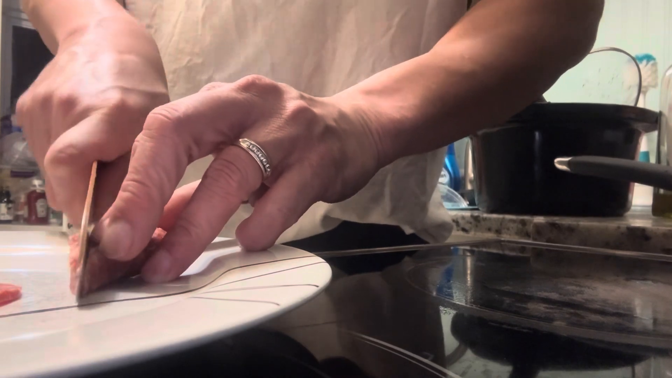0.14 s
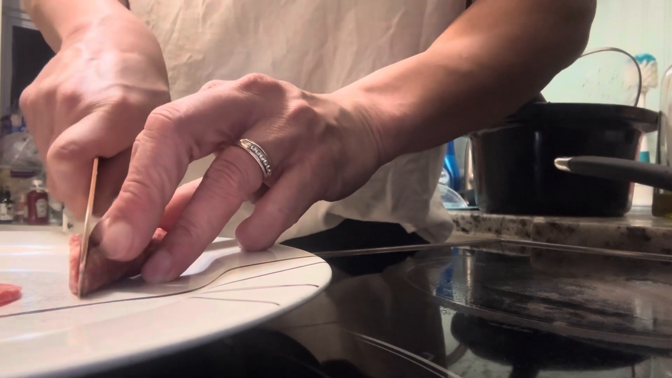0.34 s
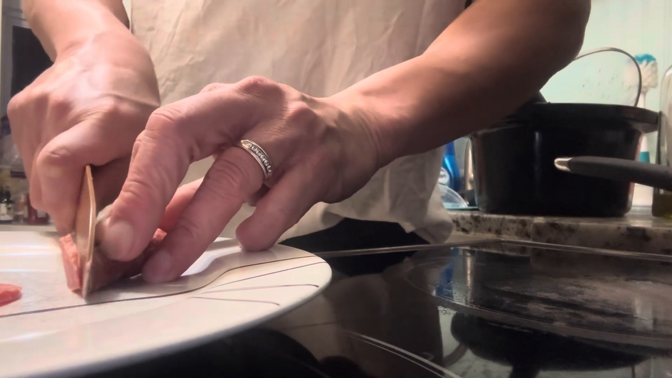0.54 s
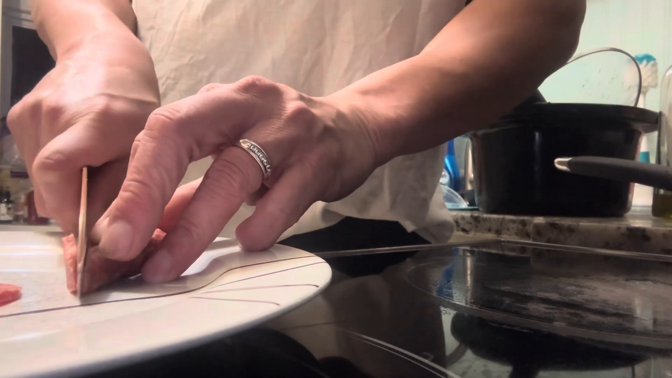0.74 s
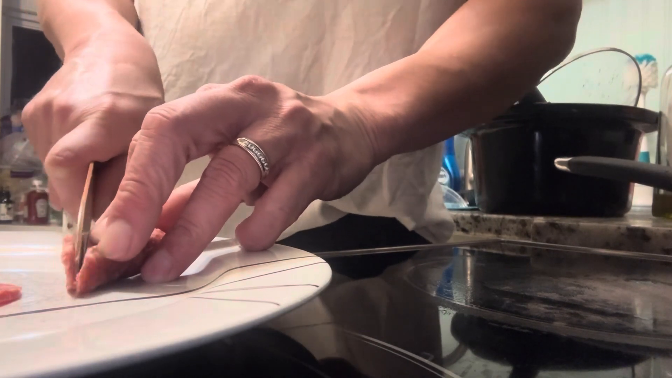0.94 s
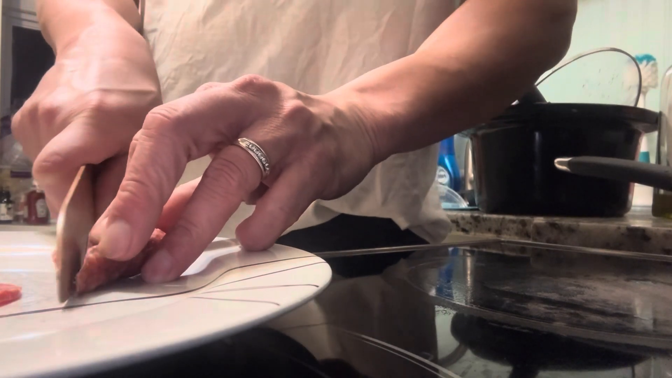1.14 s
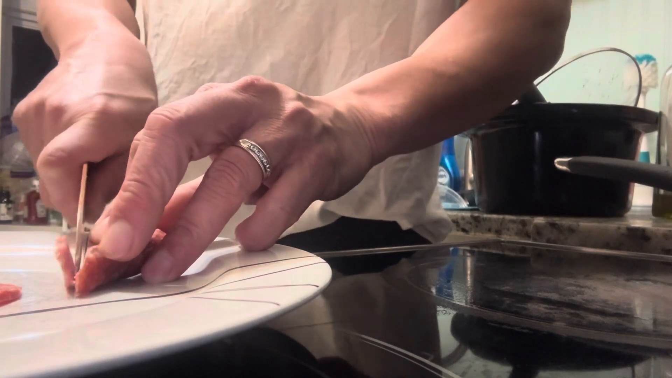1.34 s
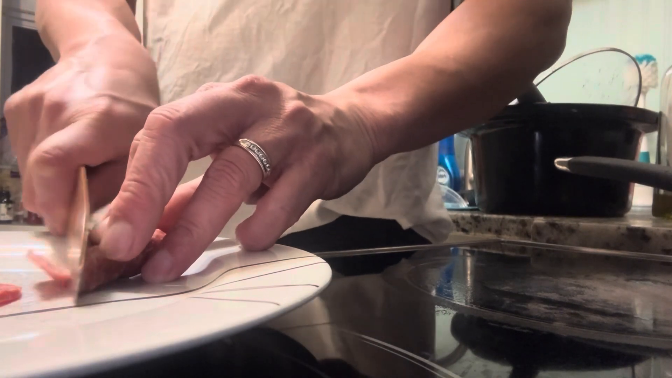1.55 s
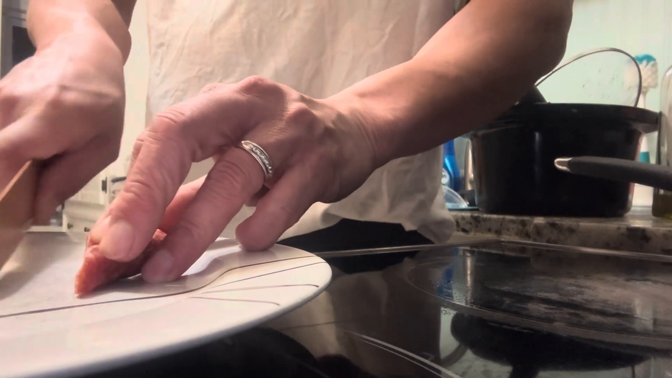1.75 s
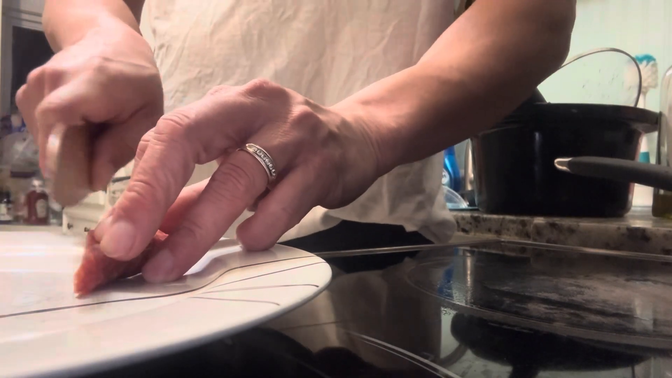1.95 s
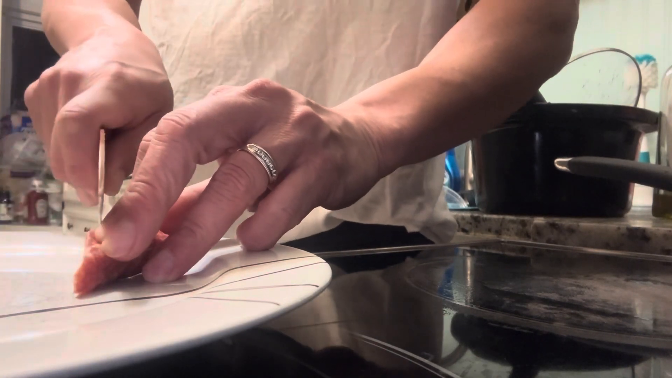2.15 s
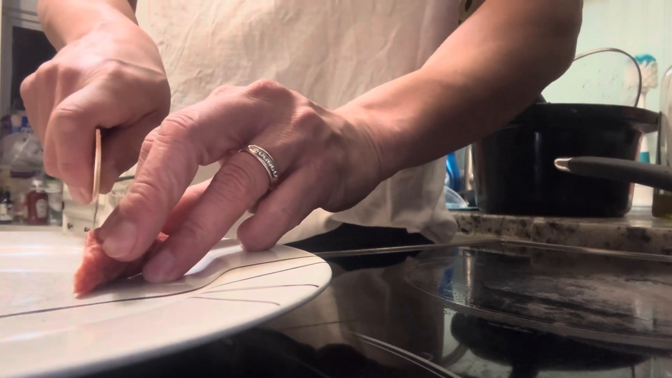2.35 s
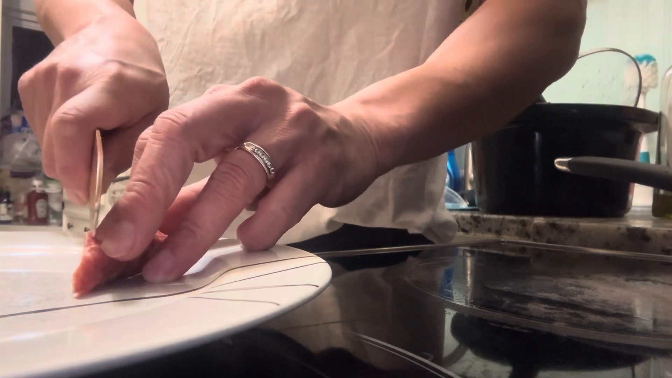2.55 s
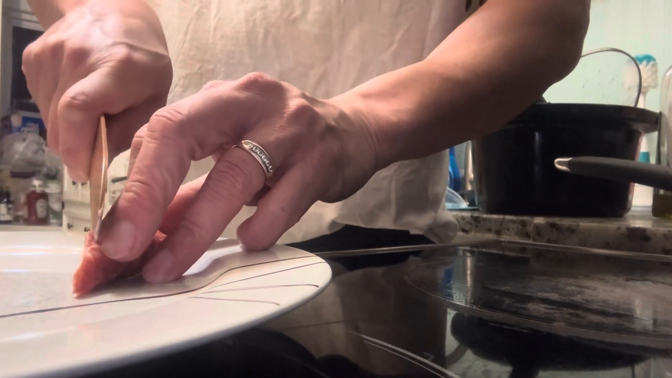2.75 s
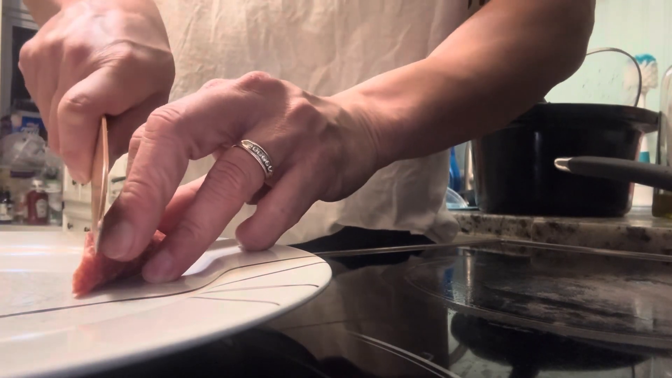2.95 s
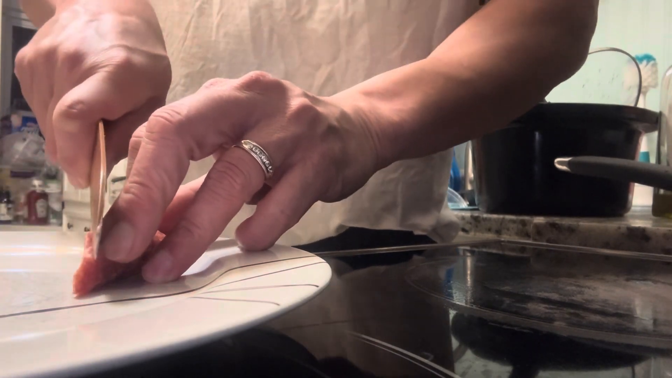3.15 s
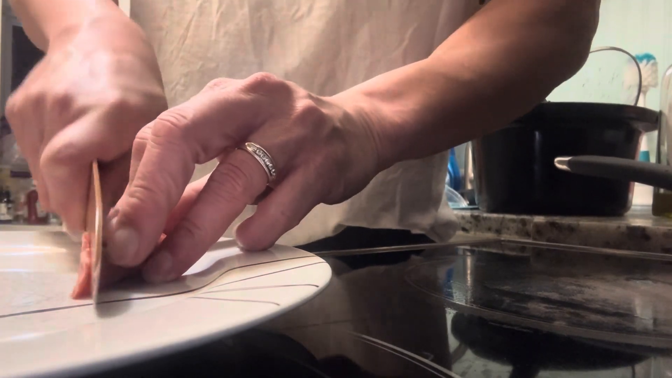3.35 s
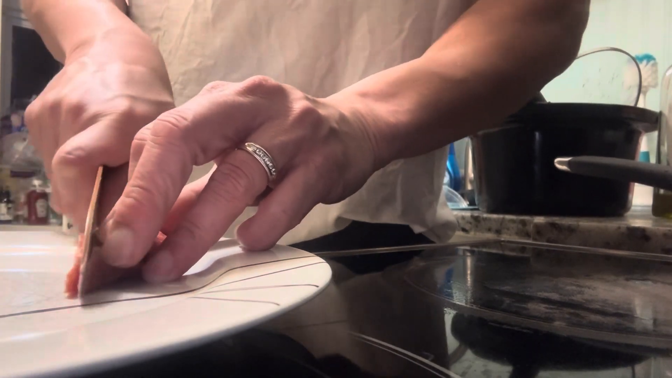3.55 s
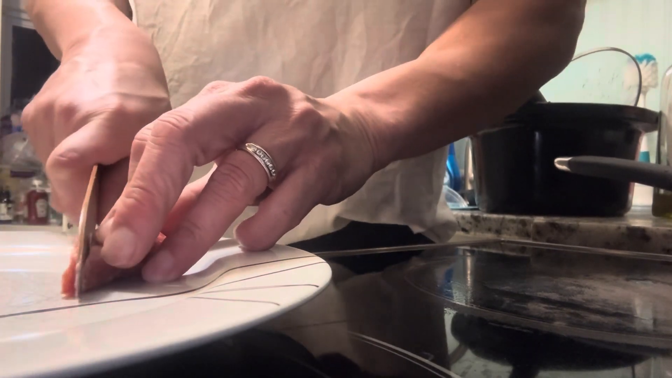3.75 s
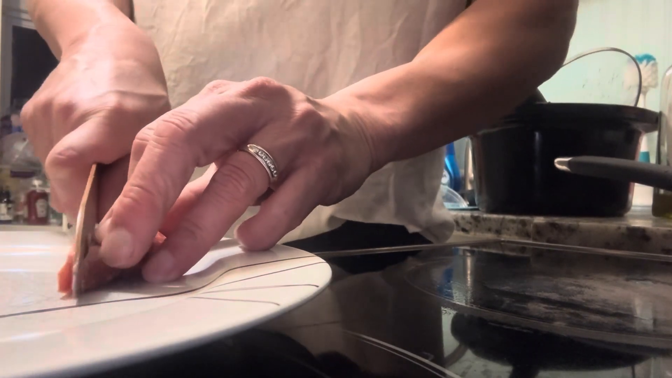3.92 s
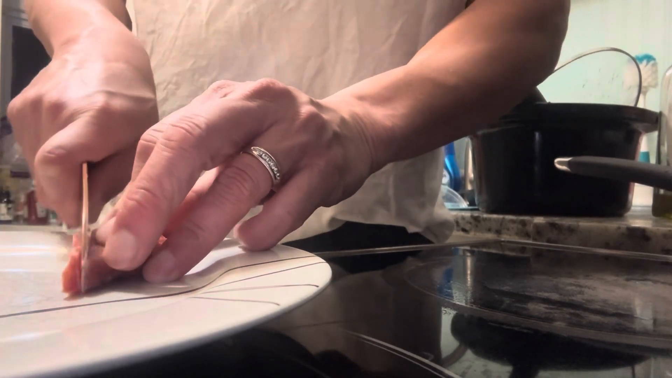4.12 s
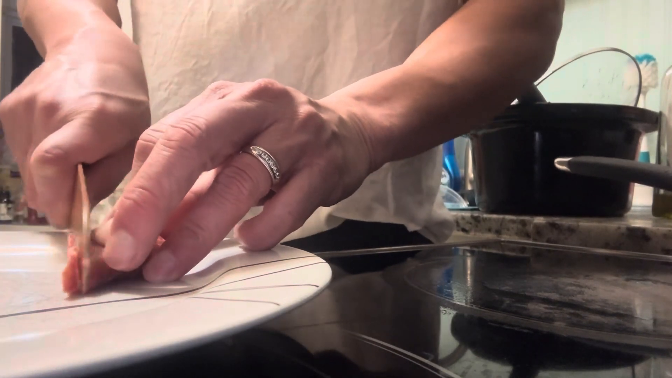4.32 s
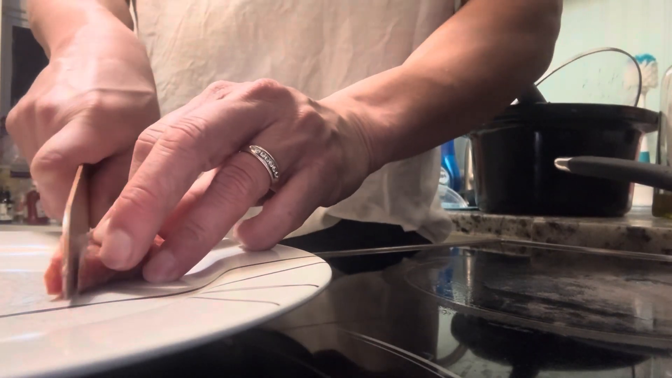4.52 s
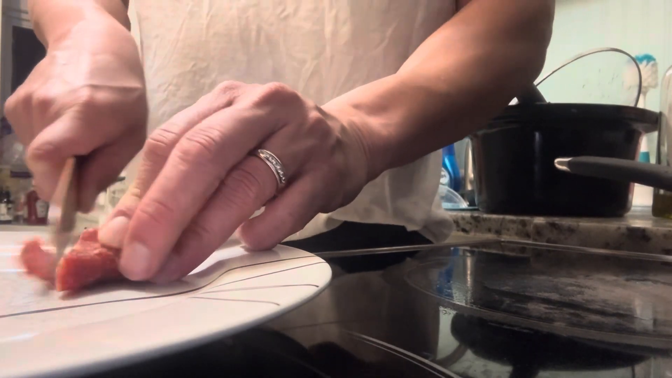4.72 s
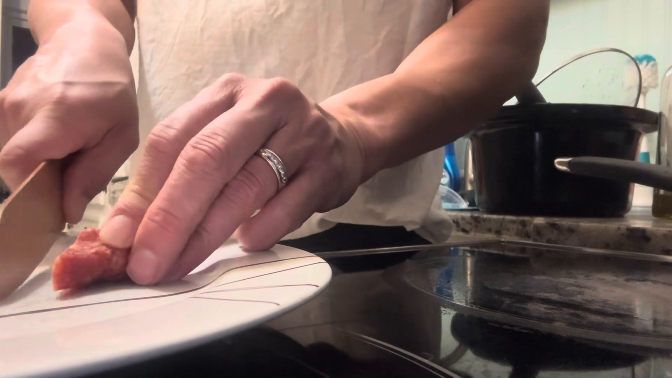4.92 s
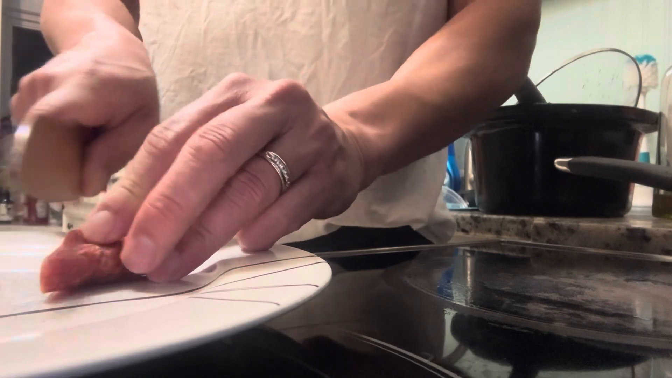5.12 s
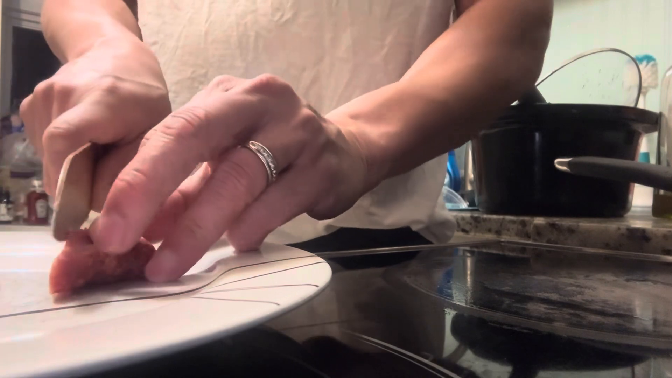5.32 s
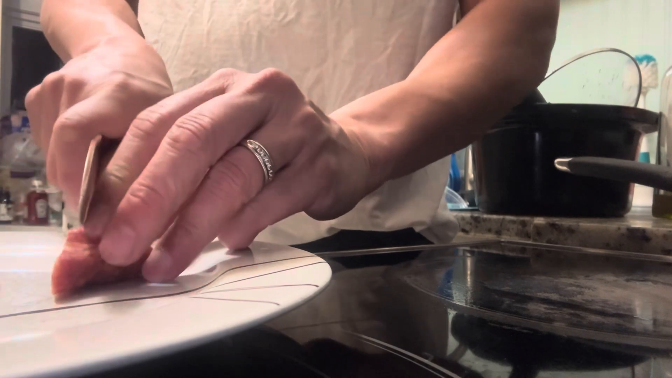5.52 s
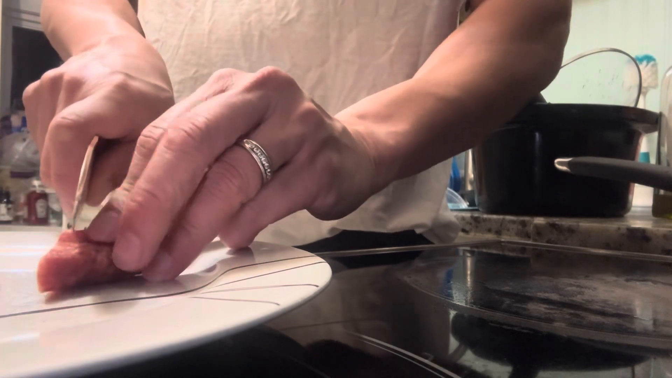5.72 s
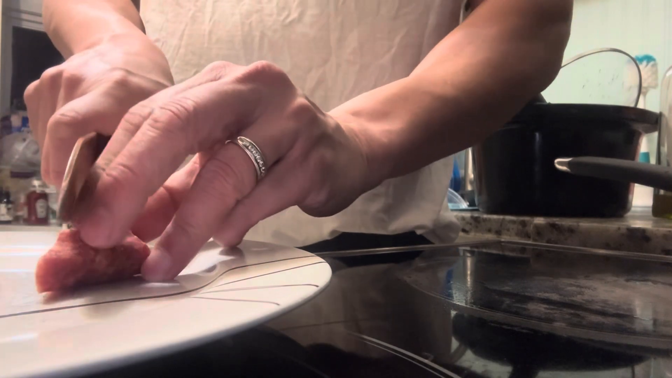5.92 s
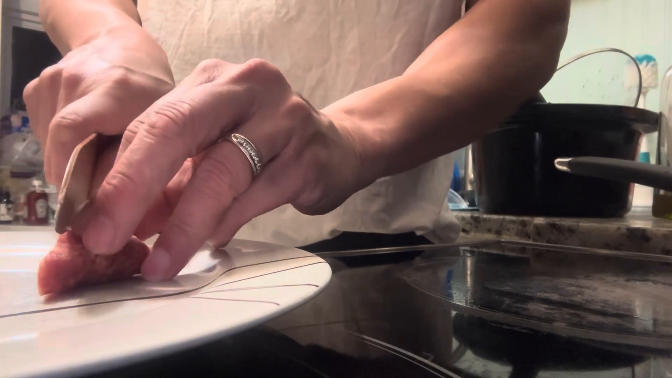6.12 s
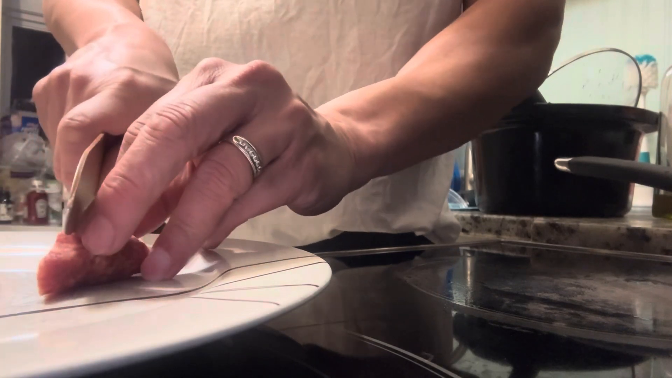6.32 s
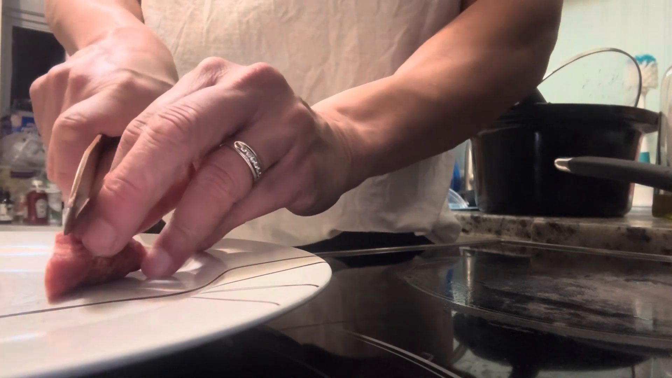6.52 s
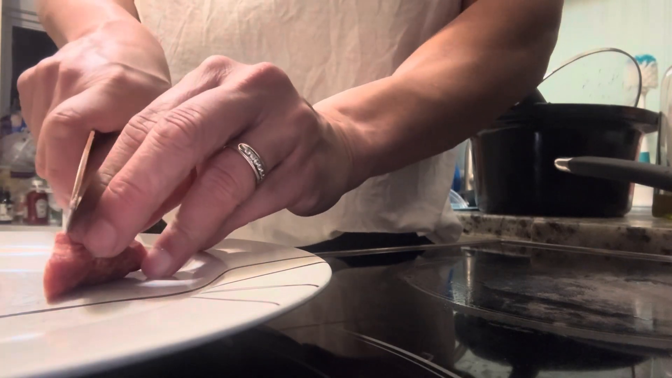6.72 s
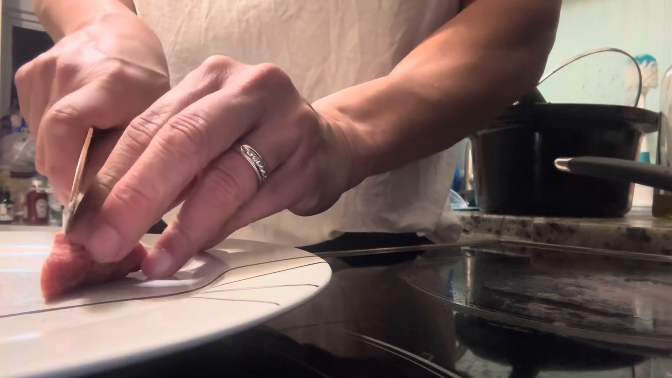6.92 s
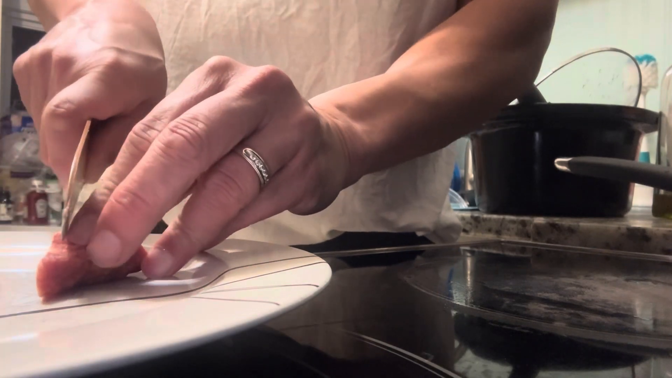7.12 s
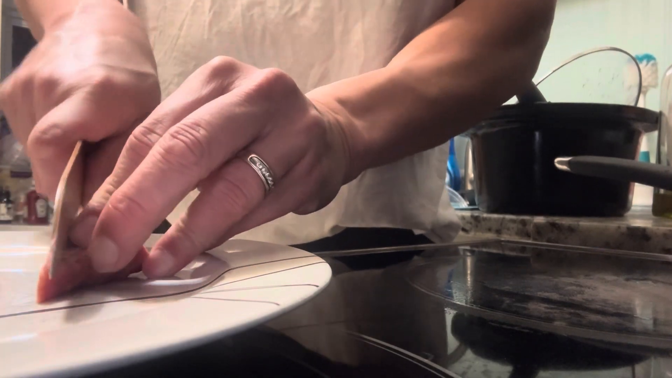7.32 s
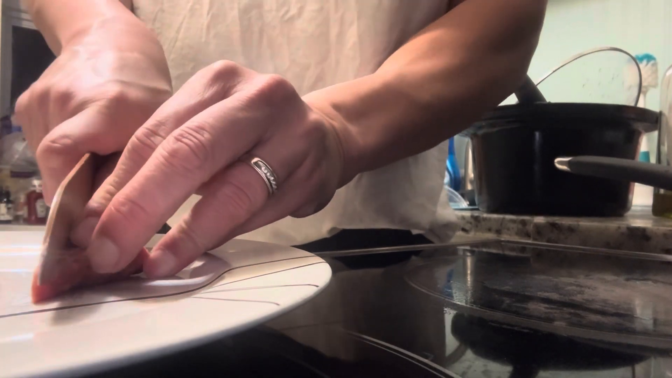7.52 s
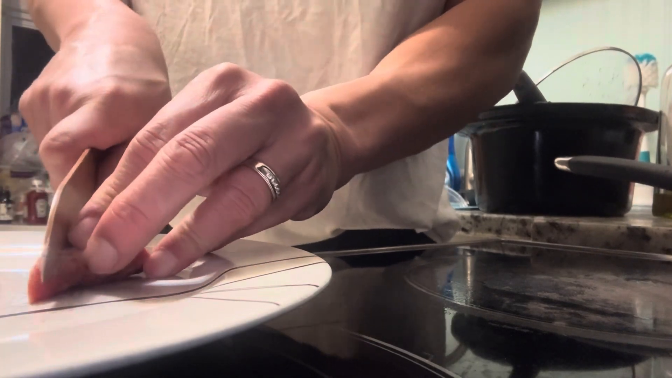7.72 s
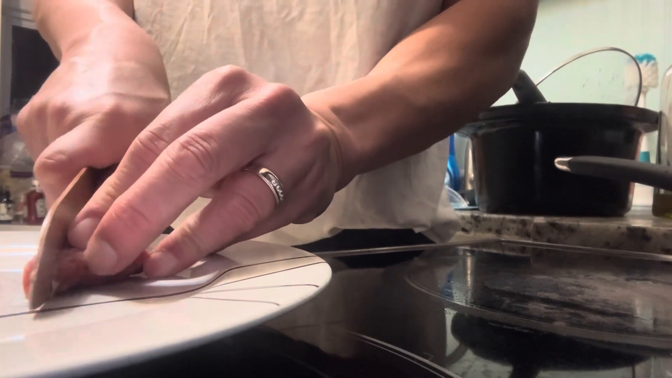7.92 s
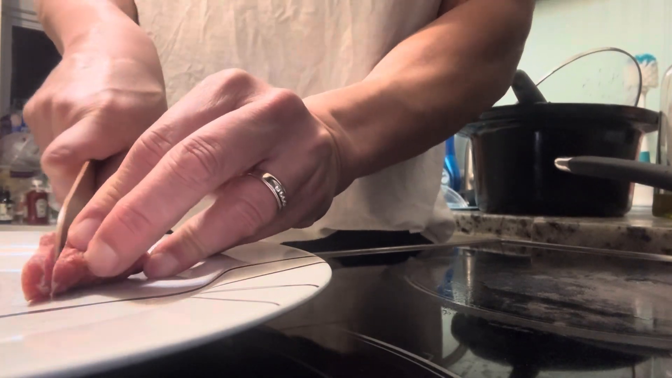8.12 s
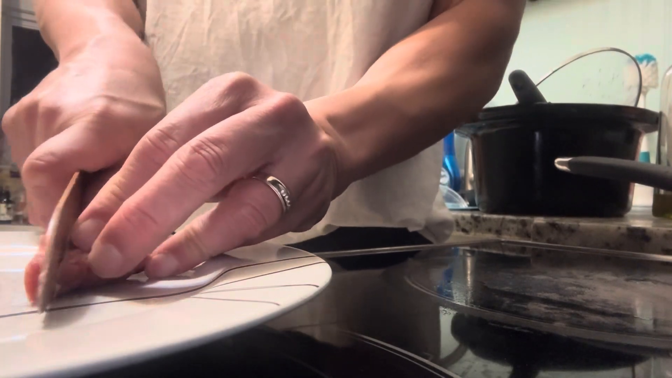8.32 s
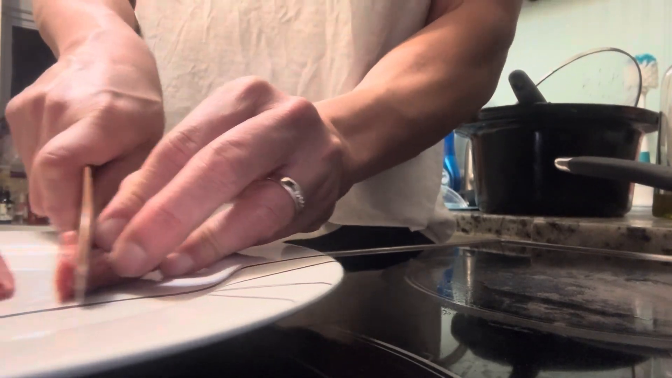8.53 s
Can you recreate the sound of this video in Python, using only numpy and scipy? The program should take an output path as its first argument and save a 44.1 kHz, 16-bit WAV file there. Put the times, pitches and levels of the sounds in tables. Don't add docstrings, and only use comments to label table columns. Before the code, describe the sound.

Irregular clacks and gritty skids of a blade on a glazed plate, between gentle sawing and low thuds in a quiet kitchen.

```python
import sys
import numpy as np
from scipy import signal
from scipy.fft import rfft, irfft, next_fast_len
from scipy.io import wavfile
from scipy.ndimage import uniform_filter1d

SR = 44100
rng = np.random.default_rng(int(sys.argv[2]) if len(sys.argv) > 2 else 0)


def to_wav(s):
    ch = np.atleast_2d(s).T
    pcm = np.round(np.clip(ch, -1, 1) * 32767)
    wavfile.write(sys.argv[1], SR, pcm.astype(np.int16))


def gain_from_db(level_db):
    decades = np.asarray(level_db, float) / 20
    return 10 ** decades


N = 381906
T = np.arange(N) / SR

# centre_hz, width_hz, level_db
PLATE_MODES = [(1670, 250, 1.5), (2080, 60, -11.5), (2350, 90, -2.5), (2776, 28, -2), (3140, 49, -3.5),
               (3635, 200, -3.5), (4100, 660, -9.5), (3980, 590, -14), (5813, 330, -9), (6160, 58, -11),
               (6780, 440, -9), (7565, 230, -7.5), (8600, 270, -18.5)]
# time_s, tremble_db
HAND_EFFORT = [(0, -49), (.6, -55), (.8, -50.5), (.95, -64.5), (1.4, -45.5), (1.9, -59.5), (2.7, -73.5),
               (3.0, -52.5), (3.5, -64), (3.83, -48), (4.2, -64), (4.6, -46), (4.92, -60), (5.1, -64),
               (6.3, -59.5), (7.6, -61.5), (7.8, -53), (8.66, -48)]
# start_s, jolt_db, bounce_hz, knock_hz, knock_db
PLATE_THUMPS = [(0.009, -32, 115.1, 530, -39.5), (0.146, -31.5, 105, 398, -39),
                (1.029, -32.5, 107.2, 250, -39.5), (1.278, -32, 90.5, 326.5, -25),
                (1.319, -38.5, 141.3, 325.5, -52), (1.61, -30, 106.2, 296.2, -18),
                (1.629, -27, 86.1, 250, -31), (3.256, -33.5, 123.7, 303.6, -34),
                (3.28, -32.5, 130.4, 282.3, -30), (3.342, -25, 98.5, 217.4, -27),
                (3.362, -21.5, 83.5, 268, -28.5), (4.36, -30, 136, 345, -14.5),
                (4.373, -23.5, 84.9, 206, -23.5), (4.908, -31.5, 121.7, 316, -35),
                (5.515, -18.5, 114.5, 237.6, -27), (7.179, -43, 129, 410, -49),
                (7.201, -32.5, 120, 260, -27), (7.746, -39, 110, 470, -38.5),
                (7.761, -30, 94.6, 526, -27.5), (7.771, -21, 94.5, 300, -33.5),
                (7.846, -40.5, 81, 620, -40), (7.861, -35, 69, 613, -37.5),
                (8.374, -43.5, 120.5, 670, -38.5), (7.987, -32.5, 109, 580, -55),
                (8.316, -46, 74.4, 620, -39.5), (8.384, -27.5, 125.5, 230, -34),
                (8.525, -30, 102.4, 482, -53), (8.598, -37, 104, 690, -40.5)]
# start_s, jolt_db, bounce_hz
MEAT_PUSHES = [(0.7, -38, 124.4), (1.343, -35.5, 105.8), (7.284, -34, 98), (1.658, -30.5, 78.9),
               (2.251, -40, 112), (2.347, -22.5, 114.7), (4.411, -21.5, 80), (4.469, -33, 94.9),
               (5.311, -44.5, 112), (5.708, -32.5, 119.2), (5.924, -22.5, 112.4), (6.18, -27, 115),
               (6.398, -41, 114.6), (6.649, -24.5, 100.3), (7.06, -46, 114.1), (7.543, -49, 103),
               (7.798, -20, 90.3), (7.841, -30.5, 75), (7.904, -48, 107)]
# start_s, peak_db, pitch_hz, length_s
BLADE_LEANS = [
    (0.332, -19.5, 100.8, 0.079),
    (2.976, -34, 105, 0.066),
    (3.754, -22.5, 89.2, .075),
    (7.272, -25.5, 93.2, 0.072),
]
ALL_JOLTS = PLATE_THUMPS + MEAT_PUSHES + BLADE_LEANS


def level(x, db):
    return x * gain_from_db(db) / np.sqrt(np.mean(x ** 2))


def log_grid():
    size = next_fast_len(N)
    return size, np.log(np.arange(size // 2 + 1) * SR / size + 1)


def shape(x, table, extra=1):
    size, log_hz = log_grid()
    at_hz, db = np.transpose(table)
    gain = gain_from_db(np.interp(log_hz, np.log(at_hz + 1), db))
    return irfft(rfft(x, size) * gain * extra, size)[..., :N]


def ring(x, hz, t60_s):
    pole = np.exp(2j * np.pi * hz / SR - np.log(1000) / (t60_s * SR))
    return signal.lfilter([1], [1, -pole], x).imag


def body(x, peaks, sharp=0.67):
    total = 0
    for hz, width_hz, db in peaks:
        t60_s = sharp * np.log(1000) / (np.pi * width_hz)
        total = total + gain_from_db(db) * np.pi * width_hz / sharp / SR * ring(x, hz, t60_s)
    return total


def split(x, hz, kind):
    return signal.sosfilt(signal.butter(4, hz, kind, fs=SR, output="sos"), x)


def walk(rate_hz):
    hold = int(SR / rate_hz)
    steps = np.repeat(rng.standard_normal(N // hold + 1), hold)
    return 1.2 * uniform_filter1d(steps, hold)[:N]


def add(track, start_s, x):
    i = max(int(start_s * SR), 0)
    track[..., i:i + x.shape[-1]] += x[..., :N - i]


def ports(x):
    # pitch_hz, left_lead_rad
    port_phase = [(25, 0), (75, -1.9), (125, -.7), (200, -1.7), (310, -3.5), (420, -3.1), (780, -5),
                  (1150, -6), (1750, -4.3), (2700, -2.2), (3700, -3.1), (4900, -3.1), (5600, -1.1),
                  (7200, .7), (9000, 2.6), (12500, 6.3)]
    # pitch_hz, left_over_right_db
    port_balance = [(60, -5), (120, -7), (180, 0), (700, -.5), (1200, -4), (2400, .5), (4900, -1),
                    (6300, -8), (8000, 0), (15000, 0)]
    _, log_hz = log_grid()
    at_hz, lead_rad = np.transpose(port_phase)
    lead_rad = np.interp(log_hz, np.log(at_hz), lead_rad)
    lift = 1 / np.sqrt(np.cos(lead_rad / 2) ** 2 + 0.2)
    pair = []
    for side in (1, -1):
        balance = [(hz, side * db / 2) for hz, db in port_balance]
        pair.append(shape(x, balance, lift * np.exp(0.5j * side * lead_rad)))
    return np.array(pair)


def wander(pair):
    drift_rad = 0.35 * walk(3)
    turn = np.exp(1j * drift_rad * np.array([[1], [-1]]))
    return (signal.hilbert(pair, next_fast_len(N))[:, :N] * turn).real


def kitchen():
    # pitch_hz, density_db_per_hz
    hum_colour = [(15, -35.5), (25, -18), (66, -0.5), (161, -7), (216, 0), (747, -21.5), (1030, -32),
                  (2580, -39), (3470, -38.5), (4670, -39.5), (6290, -35), (8010, -37), (10500, -81),
                  (13000, -32), (15700, -67)]
    floor_db, whine_hz, whine_db = -58.5, 3420, -88
    noise = shape(rng.standard_normal((3, N)) * gain_from_db(0.75 * walk(4.2)), hum_colour)
    whine_gain = gain_from_db(whine_db + 2 + 1.5 * walk(5.9))
    whine = whine_gain * np.sin(2 * np.pi * whine_hz * T + 0.6 * walk(20))
    return level(0.053 * ports(noise[0]) + noise[1:], floor_db + 2.5) + whine


def strokes():
    # middle_s, length_s, level_db, brightness_db
    saw_strokes = [(0.03, 0.39, -71, -26), (0.162, 0.34, -66, 5), (0.396, 0.53, -64.5, 3.5),
                   (0.746, 0.65, -66, 0), (0.954, 0.12, -64, -19), (1.02, 0.37, -62.5, 4.5),
                   (1.179, 0.123, -54.5, -3.5), (1.293, 0.091, -52, 3), (1.549, 0.2, -59.5, 11),
                   (1.705, 0.33, -60, 6), (2.894, 0.42, -72, 6.5), (3.02, 0.43, -61.5, -0.5),
                   (3.29, 0.35, -50, -8), (3.72, 0.086, -62.5, -3.5), (4.112, 0.42, -63, -1.5),
                   (4.302, 0.32, -63, 0.5), (4.395, 0.091, -51, -3), (4.636, 0.45, -65.5, -2.5),
                   (4.752, 0.53, -56.5, -1.5), (4.917, 0.11, -60, -9), (5.503, 0.2, -76.5, -4.5),
                   (6, 1, -93, 2.5), (6.299, 0.27, -74, -6), (6.73, 0.17, -70.5, -30),
                   (7.018, 0.14, -71, -4), (7.249, 0.38, -57, -16.5), (7.913, 0.81, -60.5, 6.5),
                   (8.112, 0.2, -71, 11.5), (8.24, 0.52, -71, 8), (8.483, 0.54, -62, 7.5)]
    rest_db = -22.5
    rest = gain_from_db(rest_db + np.interp(T, *np.transpose(HAND_EFFORT)))
    low, high = rest * np.ones((2, 1))
    for middle_s, length_s, db, bright_db in saw_strokes:
        steepness = np.where(T < middle_s, 7.0, 5.0)
        swell = 1 / np.cosh((T - middle_s) / length_s * steepness) ** 2
        low += gain_from_db(db) * swell
        high += gain_from_db(db + bright_db) * swell
    return low, high


def skids(low, high):
    # start_s, end_s, first_db, last_db,
    # squeak_hz
    blade_skids = [(0, 0.025, -36.5, -66.5, 1500), (0.144, 0.174, -73, -61.5, 3540),
                   (0.272, 0.368, -71, -50.5, 3640), (1.213, 1.246, -66, -48.5, 1760),
                   (1.357, 1.436, -54.5, -59, 5670), (1.532, 1.57, -43, -32.5, 2230),
                   (1.568, 1.657, -36, -36, 3900), (3.318, 3.348, -60, -30, 4100),
                   (3.356, 3.584, -45, -72.5, 2400), (3.729, 3.797, -61, -60, 5550),
                   (3.828, 3.911, -67.5, -55.5, 3660), (4.347, 4.362, -49.5, -43, 2330),
                   (4.429, 4.505, -54.5, -56, 5650), (4.607, 4.671, -51.5, -56.5, 3730),
                   (4.674, 4.718, -45, -43, 2182), (4.729, 4.812, -46, -54.5, 2230),
                   (4.829, 4.944, -59, -65.5, 6960), (5.517, 5.542, -62, -78.5, 1640),
                   (5.75, 5.838, -75, -82.5, 3920), (6.324, 6.352, -76.5, -65.5, 2400),
                   (7.186, 7.236, -59, -69, 2327), (7.703, 7.77, -76, -56, 1770),
                   (7.754, 7.802, -35.5, -64, 1500), (8.127, 8.217, -60, -60, 2380),
                   (8.418, 8.536, -60.5, -69.5, 2500), (8.565, 8.668, -60.5, -51.5, 2980)]
    attack_s, release_s = 0.0094, 0.008
    squeak_width_hz, squeak_db = 160, -3
    bright_db, bright_db_per_octave = 3, 2.5
    dulling = 0.05
    low, high = low.copy(), high.copy()
    squeaks = np.zeros(N)
    chatter = rng.standard_normal(N) * gain_from_db(3.5 * walk(90) + 3 * walk(25))
    for start_s, end_s, first_db, last_db, hz in blade_skids:
        inside = (T >= start_s) & (T < end_s + 4 * release_s)
        t = T[inside]
        gain = gain_from_db(np.interp(t, [start_s, end_s], [first_db, last_db]))
        gain *= np.clip((t - start_s) / attack_s, 0, 1)
        gain *= np.exp(-np.maximum(t - end_s, 0) / release_s)
        pressure_db = max(first_db, last_db) + 50.5
        treble_db = bright_db + bright_db_per_octave * np.log2(hz / 3000) - dulling * pressure_db
        low[inside] += gain
        high[inside] += gain * gain_from_db(treble_db)
        squeak = body(np.pad(chatter[inside] * gain, (0, 1000)), [(hz, squeak_width_hz, 0)])
        match = np.sqrt(np.sum(gain ** 2) / np.sum(squeak ** 2))
        add(squeaks, start_s, gain_from_db(squeak_db) * squeak * match)
    return uniform_filter1d(low, size=450), uniform_filter1d(high, size=450), squeaks


def scrape(low, high, squeaks):
    # pitch_hz, density_db_per_hz
    scrape_colour = [(410, -30.5), (700, -2.5), (1020, -25.5), (1590, -36), (1860, 1.5), (2710, -7),
                     (2930, -9), (3380, -11.5), (4560, -2.5), (5060, -14.5), (6740, -8.5), (8860, -8.5),
                     (9970, -71.5), (12000, -12.5), (15700, -63.5)]
    slip_db = 2.5 * rng.exponential(size=N) + 2.8 * walk(180) + 1.0 * walk(35)
    slips = rng.standard_normal(N) * gain_from_db(slip_db)
    modes = sum(body(slips * gain_from_db(3.5 * walk(40)), [mode], sharp=1.5) for mode in PLATE_MODES)
    sound = split(level(shape(slips, scrape_colour), 0) + level(modes, 2.5), 1150, "high")
    dull = level(split(sound, 4800, "low"), 0)
    bright = level(split(sound, 2900, "high"), 0)
    return low * dull + high * bright + squeaks


def hands(sawing):
    # centre_hz, width_hz, level_db
    worktop_modes = [(57, 4.5, -1.5), (92, 25, -5), (112, 58, 11)]
    # centre_hz, width_hz, level_db
    creak_modes = [(229, 80, -6.5), (320, 150, 7), (427, 97, -7.5), (580, 94, -1.5)]
    rumble_db, creak_db, stroke_shake_db = -1.5, -2, 0.5
    aftershake_db, aftershake_s = -18.5, 0.06
    shake = rng.standard_normal((2, N)) * gain_from_db(3.0 * walk(25))
    effort = gain_from_db(np.interp(T, *np.transpose(HAND_EFFORT))) + gain_from_db(stroke_shake_db) * sawing
    rumble = gain_from_db(rumble_db) * effort
    for start_s, db, *_ in ALL_JOLTS:
        add(rumble, start_s, gain_from_db(db + aftershake_db) * np.exp(-T[:SR] / aftershake_s))
    creak = gain_from_db(creak_db) * effort * level(body(shake[1], creak_modes), 0.42)
    return rumble * level(body(shake[0], worktop_modes), 0.13) + creak


def thumps():
    # pitch_hz, level_db, t60_s
    knock_modes = [(250, 1, 0.21), (317, 4.5, 0.042), (345, -0.5, 0.029), (450, -6.5, 0.019),
                   (583, 4, 0.015), (713, -7.5, 0.09)]
    # pitch_hz, level_db, t60_s
    slab_modes = [(79.97, 2.5, 0.52), (48, -6, 0.52)]
    push_knock_hz, push_knock_db, slab_db = 237, -16.5, -7.5
    out, t = np.zeros(N), T[:16000]
    pushes = [(s, db, hz, push_knock_hz, db + push_knock_db) for s, db, hz in MEAT_PUSHES]
    jolts = PLATE_THUMPS + pushes
    chance = rng.standard_normal((len(jolts), 1000))
    for (start_s, db, hz, knock_hz, knock_db), row in zip(jolts, chance):
        bounce = t / 0.01 * np.exp(1 - t / 0.0095) * np.sin(2 * np.pi * hz * t)
        slab_push = bounce * np.exp(-t / 0.012)
        slab = sum(gain_from_db(g) * ring(slab_push, f, t60_s) for f, g, t60_s in slab_modes)
        add(out, start_s, gain_from_db(db) * (bounce + gain_from_db(slab_db) * slab / np.abs(slab).max()))
        rock = np.zeros(len(t))
        rock[:1000] = row * t[:1000] * np.exp(-t[:1000] / 0.0025)
        modes = knock_modes + [(knock_hz, 9, 0.05)]
        knocks = sum(gain_from_db(g) * ring(rock, f, t60_s) for f, g, t60_s in modes)
        knocks = split(split(knocks, 400 + 1.0 * knock_hz, "low"), 230, "high")
        add(out, start_s, gain_from_db(knock_db + 5.0) * knocks / np.abs(knocks).max())
    for start_s, db, hz, length_s in BLADE_LEANS:
        swell = np.sin(np.pi * np.clip(t / length_s, 0, 1) ** 1.8) ** 2 * np.sin(2 * np.pi * hz * t)
        hum = ring(swell, slab_modes[0][0], slab_modes[0][2])
        add(out, start_s, gain_from_db(db) * (swell + 0.3 * hum / np.abs(hum).max()))
    return split(out, 1200, "low")


def sway():
    sway_db, sway_s, sway_hz = -25, 0.1, 42
    after = np.zeros(N)
    for start_s, db, *_ in ALL_JOLTS:
        add(after, start_s, gain_from_db(db + sway_db) * np.exp(-T[:SR] / sway_s))
    return after * level(split(rng.standard_normal((2, N)), sway_hz, "low"), 0)


def ticks():
    # start_s, peak_db, brightness_db, strongest_mode_hz
    light_ticks = [(0.1576, -45, -7, 3560), (0.312, -45.5, -7, 1760), (0.633, -48, -21, 4040),
                   (0.822, -47, -6, 1700), (1.0899, -38, -43, 1240), (1.178, -52, 12, 1810),
                   (1.4204, -51.5, -16, 4000), (1.4728, -42.5, -12.5, 1160), (1.934, -58, -25, 1690),
                   (1.985, -63, -20, 1700), (2.05, -65, -25, 1900), (2.235, -65, -20, 1640),
                   (2.348, -60, -31, 1650), (2.452, -59, -35, 1860), (2.4855, -53, -40, 1900),
                   (2.731, -60, -20, 3200), (3.2524, -43, -16.5, 1720), (3.2914, -45, -3, 1750),
                   (3.7532, -44, 10.5, 3710), (3.835, -35.5, -12, 2220), (4.5473, -44, -25.5, 1310),
                   (5.027, -73, 20, 4050), (5.452, -54, 5, 3330), (5.5145, -49.5, -19, 1403),
                   (5.8401, -43.5, 9.5, 1860), (5.9217, -41.5, 7, 2284), (6.098, -51, -2, 1686),
                   (6.186, -65.5, 22, 4000), (6.2682, -51, -18, 1730), (7.441, -52, -28.5, 1356),
                   (7.8446, -48, 11, 3600), (8.0411, -41, -30, 1290), (8.192, -51, 8.5, 2370)]
    # start_s, peak_db, brightness_db, strongest_mode_hz, ring_db
    hard_chops = [(1.0071, -24, -2, 1670, 1.5), (1.278, -22.5, -12, 1720, 11), (1.2795, -30, -6, 3124, 2),
                  (1.3743, -32.5, -2.5, 1692, 2), (1.5828, -17, -1, 1670, 8),
                  (1.6541, -10.5, -8.5, 1663, -4.5), (3.3335, -24, -8.5, 2303, -7),
                  (3.3377, -5.5, -6, 2266, -6), (3.8955, -32.5, -2.5, 3520, 5),
                  (4.361, -7, -22, 3274, -5.5), (4.3624, -12, -23.5, 1670, -13),
                  (4.3684, -12, -21.5, 2080, 4), (4.6972, -32.5, -14, 2050, -0.5),
                  (4.9295, -30.5, -20, 1750, 14.5), (7.215, -30, -11.5, 2360, 14),
                  (7.7615, -14, -30, 1760, -6), (7.7678, -21, -4.5, 1350, -5), (7.863, -37, -2, 4030, 1),
                  (7.9805, -33, 2, 1720, 2), (8.1678, -38.5, -7, 1660, -1), (8.169, -30, -4, 2320, 6),
                  (8.3134, -48, -4, 1670, -6), (8.3793, -41, -14, 1190, -5)]
    tick_ring_db = 4.5
    out, t = np.zeros(N), T[:2500]
    hits = hard_chops + [(*tick, tick_ring_db) for tick in light_ticks]
    chance = rng.standard_normal((len(hits), len(t) + len(PLATE_MODES)))
    for (start_s, db, bright_db, spot_hz, ring_db), row in zip(hits, chance):
        rattle = row[:len(t)] * t * np.exp(-t / 0.00089)
        spot = [(hz, w, g + 1.5 * c) for (hz, w, g), c in zip(PLATE_MODES, row[len(t):])]
        rings = body(rattle, spot + [(spot_hz, 90, 9)], sharp=0.95)
        contact = split(rattle, 1250, "high") / np.abs(rattle).max()
        both = contact + gain_from_db(ring_db + 5) * rings / np.abs(rings).max()
        dull = split(split(both, 3900, "low"), 1000, "high")
        bright = split(split(both, 4700, "high"), 13000, "low")
        bright = bright + 0.12 * split(split(both, 7700, "high"), 7900, "low")
        hit = dull / np.abs(dull).max() + gain_from_db(bright_db) * bright / np.abs(bright).max()
        add(out, start_s, gain_from_db(db) * hit)
    return out


def sings():
    # middle_s, length_s, peak_db, pitch_hz
    sung_modes = [(1.19, .06, -52, 1700), (1.247, 0.054, -44, 1700), (1.236, .03, -51, 2740),
                  (1.423, .02, -44, 5750), (1.552, .014, -23.5, 1600), (1.553, .01, -21, 2745),
                  (1.559, .014, -17.5, 2760), (1.558, .014, -26.5, 5670), (1.588, .01, -24.5, 6530),
                  (1.586, 0.0093, -25.5, 4620), (1.603, .024, -22.5, 3470), (1.612, 0.037, -27, 6500),
                  (1.621, .014, -24, 3070), (1.622, .06, -26, 2760), (1.62, .02, -29.5, 5600),
                  (1.626, 0.046, -25.5, 1602), (1.641, .03, -26.5, 6560), (1.645, .024, -24.5, 1599),
                  (1.646, .01, -30.5, 7260), (1.658, 0.017, -15, 3460), (1.663, 0.035, -30.5, 6510),
                  (3.327, .03, -30, 2320), (3.354, 0.022, -29, 2320), (3.4, 0.064, -40.5, 3950),
                  (4.37, 0.011, -18.5, 3180), (4.638, 0.034, -42.5, 2730), (4.64, .03, -45, 1600),
                  (4.702, .02, -31, 2740), (4.705, .04, -29.5, 2120), (4.693, .04, -34, 3680),
                  (4.715, .02, -48, 6700), (4.747, .03, -37, 1680), (4.75, 0.023, -35, 2750),
                  (4.755, .04, -44, 6830), (4.81, 0.022, -47, 2800), (4.848, .05, -61, 6750),
                  (4.855, .04, -42, 3760), (7.73, 0.027, -55, 1710), (7.768, .014, -22, 2250),
                  (7.871, .03, -41, 2290), (7.876, 0.031, -45, 4030), (7.931, .04, -59, 1720),
                  (8.213, .025, -44, 2310), (8.2, 0.052, -55, 6740), (8.287, 0.069, -51.5, 3400),
                  (8.288, .03, -51, 6740), (8.382, 0.022, -52, 2260), (8.466, 0.041, -52, 6700),
                  (8.643, 0.026, -55, 3730), (8.608, 0.035, -48, 1490)]
    width_hz = 70
    out, t = np.zeros(N), T[:6000]
    chance = rng.standard_normal((len(sung_modes), len(t)))
    for (middle_s, length_s, db, hz), row in zip(sung_modes, chance):
        swell = np.sin(np.pi * np.clip(t / length_s, 0, 1)) ** 2
        tone = body(swell * row, [(hz, width_hz, 0)])
        add(out, middle_s - length_s / 2, gain_from_db(db) * tone / np.abs(tone).max())
    return out


def room_tail():
    t60_s, tail_db, damping_hz = 0.22, -16.5, 7000
    echo_s, onset_s = 0.011, 0.0036
    t = T[:16000]
    tail = rng.standard_normal((2, len(t))) * np.exp(-np.log(1000) * t / t60_s)
    tail *= np.clip((t - echo_s) / onset_s, 0, 1)
    tail = split(tail, damping_hz, "low") + 0.45 * tail
    return tail * gain_from_db(tail_db) / np.sqrt(np.sum(tail ** 2) / 2)


def scene():
    low, high = strokes()
    plate = scrape(*skids(low, high)) + ticks() + sings()
    tail = room_tail()
    solid = thumps() + hands(low)
    room = signal.fftconvolve((plate + 2.15 * solid)[None], tail, axes=1)[:, :N]
    return wander(ports(plate + solid)) + room + kitchen() + sway()


def band_limit(x):
    return signal.sosfilt(signal.butter(12, 15870, fs=SR, output="sos"), x)


def record(dry):
    # pitch_hz, gain_db
    mic_colour = [(880, 0), (1040, -5), (1230, 0), (9000, 0), (9400, -24), (10900, -24), (11400, 0),
                  (13700, 0), (15200, -24)]
    coloured = shape(split(dry, 38, "high"), mic_colour)
    mix = np.tanh(0.82 * coloured) / 0.76
    return band_limit(mix)


dry = scene()
out = record(dry)
to_wav(out)
```